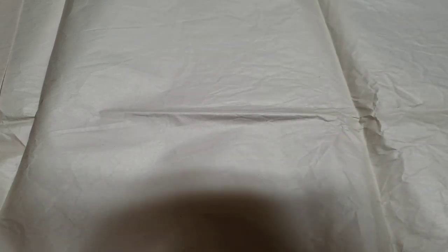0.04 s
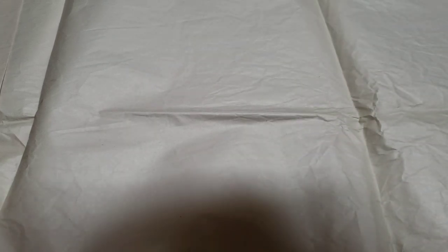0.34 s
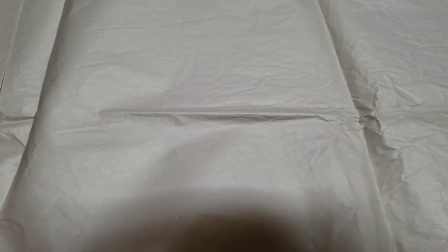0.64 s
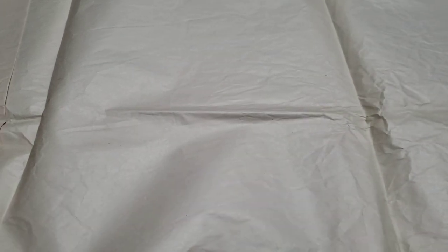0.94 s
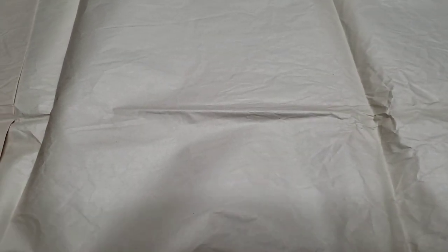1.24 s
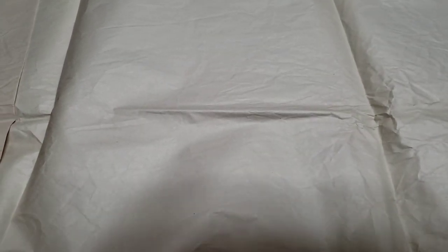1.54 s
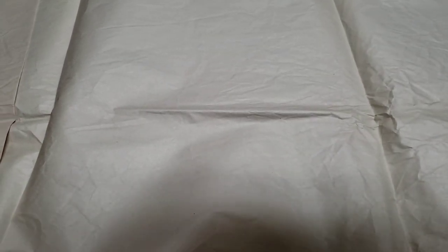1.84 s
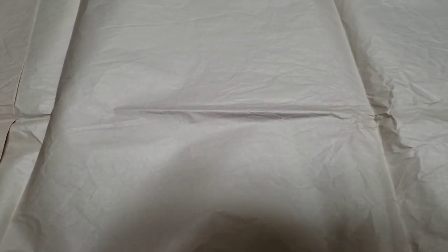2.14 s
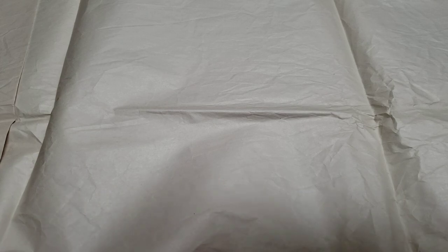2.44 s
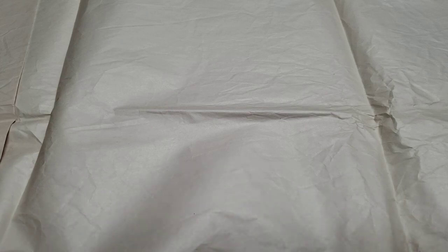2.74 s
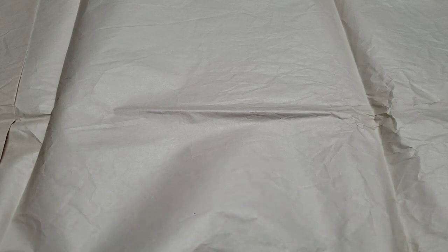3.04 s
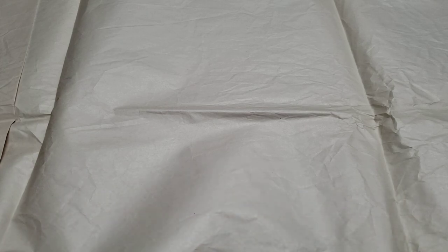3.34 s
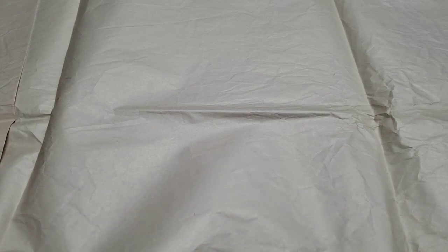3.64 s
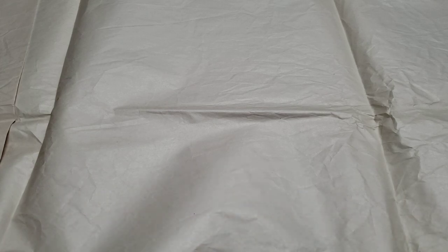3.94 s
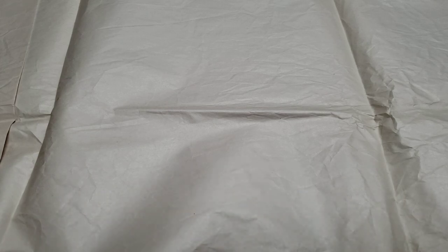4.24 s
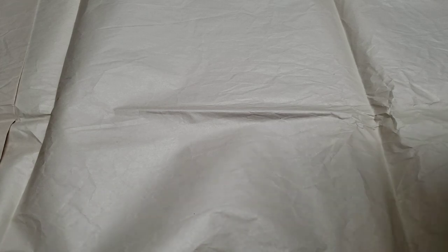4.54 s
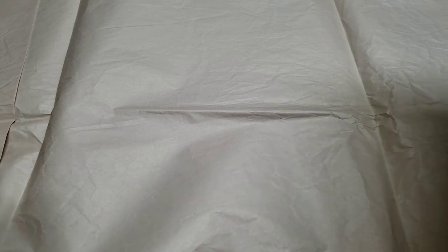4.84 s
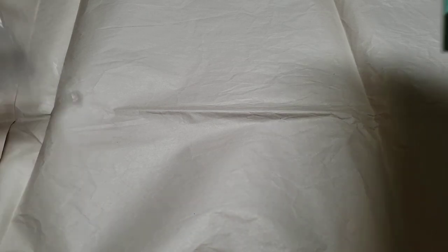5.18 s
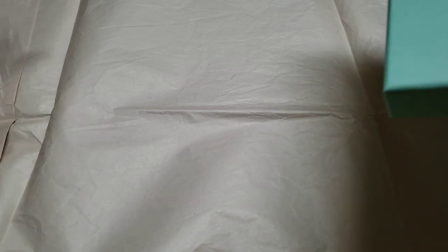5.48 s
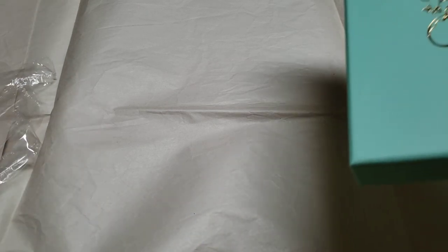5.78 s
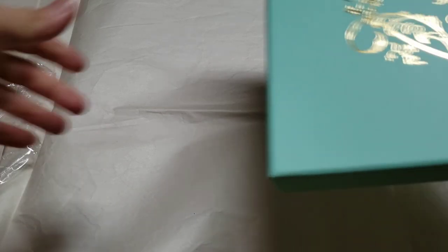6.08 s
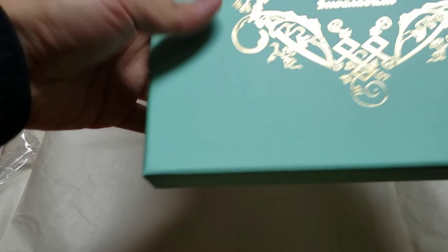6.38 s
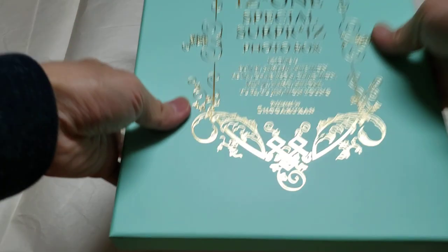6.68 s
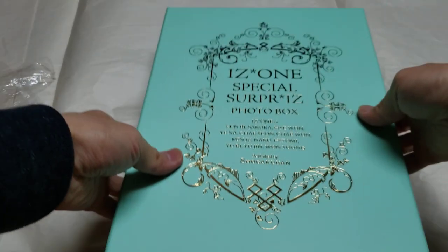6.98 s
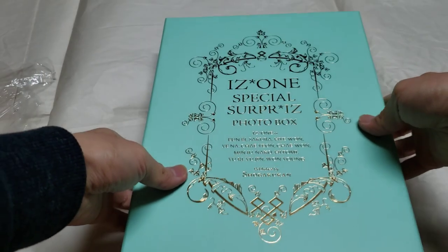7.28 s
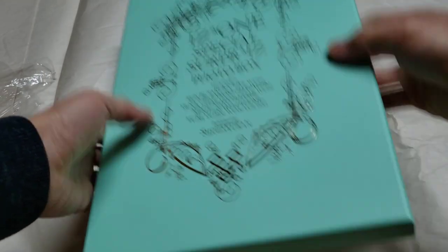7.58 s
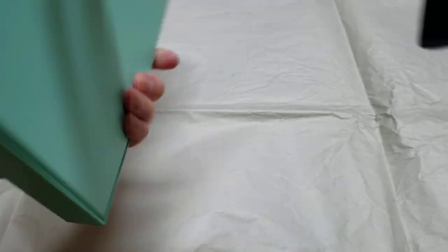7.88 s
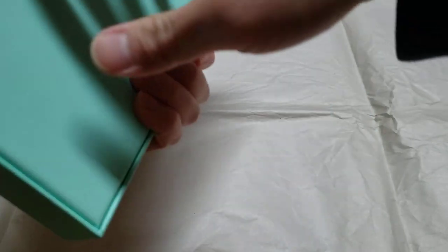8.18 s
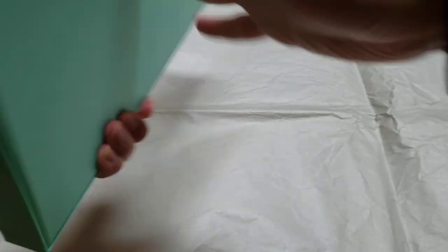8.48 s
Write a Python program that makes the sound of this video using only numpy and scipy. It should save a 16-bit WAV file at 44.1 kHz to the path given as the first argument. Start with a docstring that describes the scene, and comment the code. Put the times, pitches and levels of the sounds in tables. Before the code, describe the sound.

Close tissue paper rustling with crisp snaps and cardboard knocks, followed by light plastic ticks and the soft scrape of a box being handled.

```python
"""Tissue paper in a cardboard box

Hands smooth and crinkle the paper, close to a two-port microphone in a small room. Fibres slip in a
dull scrape and a crisp fizz, creases snap, and the hands rub and bump the hollow cardboard.
Then a plastic wrapper crackles on the left and a smaller box is slid over the paper, gripped and turned.
Narrow hisses and hums come and go, with two faint breathy whistles."""
import sys
import numpy as np
from scipy import signal
from scipy.fft import rfft, irfft
from scipy.io import wavfile
from scipy.ndimage import uniform_filter1d

SR = 44100
rng = np.random.default_rng(int(sys.argv[2]) if len(sys.argv) > 2 else 0)


def persist_wave(psi):
    """Save psi, clipped to +-1, as 16-bit WAV."""
    counts = np.round(np.clip(psi, -1, 1) * 32767).astype(np.int16)
    wavfile.write(sys.argv[1], SR, np.atleast_2d(counts).T)


N = 380141
HZ = np.fft.rfftfreq(4096, 1 / SR)


def gain_of(db):
    """Decibels to amplitude."""
    return 10 ** (np.asarray(db) / 20)


def unit_rms(x):
    """Scales to an rms of 1."""
    return x / np.sqrt(np.mean(x ** 2) + 1e-20)


def at_hz(points, hz, column=1):
    """One column of a table, interpolated over log frequency."""
    table = np.transpose(points)
    return np.interp(np.log(hz + 1), np.log(table[0] + 1), table[column])


def curves(rows):
    """Every column of a time table, at each sample."""
    times, *columns = np.transpose(rows)
    return [np.interp(np.arange(N) / SR, times, column) for column in columns]


def add(mix, start_s, sound):
    """Mixes in a stereo sound."""
    part = mix[:, round(start_s * SR):][:, :sound.shape[-1]]
    part += sound[..., :part.shape[1]]


def through(x, response):
    """Filters each channel with its response."""
    return signal.oaconvolve(np.atleast_2d(x), response, axes=1)[:, :N]


def wander(per_s):
    """A slow random curve with rms 1."""
    knots = rng.standard_normal(N // 40)
    return unit_rms(np.interp(np.arange(N) / SR * per_s, np.arange(len(knots)), knots))


def band_db(hz, width_hz):
    """Spectrum of one resonance."""
    return -20 * np.log10(1 + (2 * (HZ - hz) / width_hz) ** 2)


# Tone of the microphone ports: freq_hz, left_db, right_db
PORT_EQ = [(304, -2.5, 0), (985, 4.5, 3), (2000, -2, 0.5), (3400, 5.5, 0.5), (4475, 11.5, 2.5),
           (5440, -0.5, 2), (6600, -12, 3), (7300, -7.5, 6), (8460, -9, -0.5), (10360, -2, 5),
           (11200, 4, 9.5), (11840, -3.5, 10.5), (13100, -19, 12), (15000, -1, 16.5), (15900, -4.5, 2)]
def colour(spectrum_db, bass_lag_s=0.0007):
    """A click of this spectrum at both ports; bending waves carry its treble across the sheet first."""
    stereo_db = spectrum_db + np.array([at_hz(PORT_EQ, HZ, column) for column in (1, 2)])
    fold = np.r_[1, np.full(len(HZ) - 2, 2), 1, np.zeros(len(HZ) - 2)]
    log_response = rfft(irfft(np.log(gain_of(stereo_db))) * fold)  # minimum phase
    delay_s = bass_lag_s * (1 - HZ / HZ[-1]) ** 2
    click = irfft(np.exp(log_response - 2j * np.pi * np.cumsum(delay_s) * HZ[1]))
    return click / np.sqrt(np.sum(click ** 2) / 4)


def pan(pan_db, click):
    """Gains that move a click without changing its power; pan_db is left minus right."""
    gains = gain_of(np.outer([0.5, -0.5], pan_db))
    energy = np.sum(click ** 2, 1, keepdims=True)
    return gains / np.sqrt((energy * gains ** 2).sum(0) / energy.sum())


def arrival(pan_db, spread=0, decay_s=1):
    """A direct click, offset between the ports, then scatter from the paper and the box walls."""
    cloud = rng.standard_normal((2, 2048)) * np.exp(-np.arange(2048) / SR / decay_s)
    paths = np.sqrt(spread) * cloud / np.linalg.norm(cloud, axis=1, keepdims=True)
    left_lag = int(np.clip(11 - pan_db, -15, 15))
    paths[0, max(left_lag, 0)] += np.sqrt(1 - spread)
    paths[1, max(-left_lag, 0)] += np.sqrt(1 - spread)
    return paths


def diffuse(clicks, decay_s):
    """Every click leaves a short cloud of reflections, different at each port."""
    pole = np.exp(-2 / (decay_s * SR))
    power = signal.lfilter([1 - pole], [1, -pole], clicks ** 2)
    return np.sqrt(power) * rng.standard_normal((2, N))


# Bed of the quiet room: freq_hz, level_db
ROOM_TONE_EQ = [(24, -49), (40, -9.5), (56, 6.5), (80, -8.5), (120, -16.5), (400, -18), (1500, -33.5),
                (4500, -37.5), (9000, -40)]
def room_tone(level_db=-71.5):
    """Low rumble shared by both ports under a faint hiss."""
    hz = np.fft.rfftfreq(N, 1 / SR)
    noise = rfft(rng.standard_normal((3, N)))
    shared = 0.68 / (1 + (hz / 900) ** 2)
    stereo = np.sqrt(shared) * noise[0] + np.sqrt(1 - shared) * noise[1:]
    return gain_of(level_db) * unit_rms(irfft(stereo * gain_of(at_hz(ROOM_TONE_EQ, hz)), N))


def swell(peak_s, rise_s, fall_s, shape=1.82):
    """Power of a hand move that speeds up, then slows; shape 1 is pointed, 2 is a bell."""
    near = slice(max(round((peak_s - 4 * rise_s) * SR), 0), min(round((peak_s + 4 * fall_s) * SR), N))
    t = np.arange(near.start, near.stop) / SR - peak_s
    power = np.zeros(N)
    power[near] = np.exp(-2 * np.maximum(-t / rise_s, t / fall_s) ** shape)
    return power


# Light contact between strokes: time_s, scrape_db
LIGHT_TOUCH = [(0, -63), (.8, -66), (1.4, -70.5), (2.2, -59.5), (3.3, -60.5), (4.85, -63.5), (5.4, -67.5),
               (5.87, -79), (6.95, -68), (7.25, -81), (8.5, -85.5)]
# Strokes over the paper: peak_s, rise_s, fall_s, scrape_db, fizz_over_scrape_db
PAPER_STROKES = [(.115, 0.028, 0.027, -50.5, 4), (0.193, 0.048, 0.035, -44, 2.5),
                 (.43, 0.025, 0.019, -54, 1.5), (.53, 0.095, 0.08, -54.5, 1),
                 (0.706, 0.049, 0.028, -39, 4.5), (.77, .02, 0.019, -62.5, 8),
                 (.9, 0.037, 0.018, -61.5, 11.5), (1.1, 0.22, 0.11, -60, -1), (1.24, 0.12, 0.092, -65, 8),
                 (1.57, 0.085, 0.043, -64, 2), (1.69, 0.039, 0.27, -64.5, 7.5),
                 (2.02, 0.12, 0.028, -53.5, -2), (2.2, 0.12, 0.025, -52, 3), (2.345, 0.065, 0.25, -53.5, 6),
                 (2.584, 0.07, 0.045, -51, 10.5), (2.776, 0.054, 0.0093, -48.5, 2.5),
                 (3.0, 0.065, 0.05, -53, 15.5), (3.088, 0.05, 0.072, -42, 8),
                 (3.19, 0.057, 0.033, -48.5, 4.5), (3.46, 0.12, 0.058, -65, 12.5),
                 (3.62, 0.13, 0.15, -57, 15), (3.99, 0.19, 0.67, -50, -1.5), (4.23, 0.11, 0.18, -46.5, 7),
                 (4.367, 0.057, 0.062, -34, 2), (4.54, 0.056, 0.1, -53, -5), (5.068, 0.16, 0.12, -51, -6),
                 (5.194, 0.038, 0.051, -47.5, -5.5), (5.52, 0.0041, 0.017, -44.5, 1),
                 (5.609, 0.11, 0.11, -53, -6), (6.099, 0.12, 0.3, -65, -9), (6.65, 0.22, 0.19, -58.5, -2),
                 (7.8, 0.12, 0.064, -56.5, -0.5), (7.852, 0.03, 0.066, -67, 15),
                 (8.17, 0.33, 0.088, -69, 6.5), (8.522, 0.0072, 0.016, -53, -5),
                 (8.56, 0.13, 0.13, -67, 10)]
def strokes():
    """Scrape and fizz levels in dB: each stroke swells out of the light touch."""
    touch_db, = curves(LIGHT_TOUCH)
    dull, crisp = gain_of(touch_db) ** 2, gain_of(touch_db - 3) ** 2
    for peak_s, rise_s, fall_s, scrape_db, fizz_over_db in PAPER_STROKES:
        power = swell(peak_s, rise_s, fall_s) * gain_of(scrape_db) ** 2
        dull += power
        crisp += power * gain_of(fizz_over_db) ** 2
    return 10 * np.log10(dull), 10 * np.log10(crisp)


def slips(per_s, uneven_db):
    """Tiny stick-slip clicks, many small and a few large, at a steady mean power."""
    sizes = gain_of(uneven_db * np.minimum(rng.exponential(1, N), 5))
    train = sizes * rng.standard_normal(N) * (rng.random(N) < per_s / SR)
    return train / np.sqrt(np.maximum(uniform_filter1d(train ** 2, size=8000), 1e-9))


# Spots where the paper is touched: pan_db
CONTACT_SPOTS = [-4, 2, 11, 21]
def friction(level_db, pan_db, uneven_db, click, per_s, spread):
    """Fibres slip loudest at the spots near the hand; spread is the scattered share of the power."""
    shares = np.array([np.exp(-abs(pan_db - spot) / 7) for spot in CONTACT_SPOTS])
    shares /= np.linalg.norm(shares, axis=0)
    trains = [slips(per_s, uneven_db) * share * gain_of(level_db) for share in shares]
    direct = sum(through(train, arrival(spot)) for spot, train in zip(CONTACT_SPOTS, trains))
    scattered = diffuse(sum(trains), decay_s=0.0067)
    return through(np.sqrt(1 - spread) * direct + np.sqrt(spread) * scattered, click)


def flexing(sheet, depth_db):
    """As the sheet bends, broad bands of its sound swell and fade."""
    bands = signal.stft(sheet, SR, nperseg=512)[2]
    patches = rng.standard_normal(bands.shape[1:])
    for _ in range(2):
        patches = uniform_filter1d(uniform_filter1d(patches, size=9, axis=0), size=11, axis=1)
    return signal.istft(bands * gain_of(depth_db * unit_rms(patches)), SR, nperseg=512)[1][:, :N]


# Travel of the hands and grain of their slips: time_s, pan_db, uneven_db
HAND_PATH = [(0, 0.5, 2), (1, 0.5, 3), (1.8, 3, 3.5), (2.6, -1, -2), (3.5, 0.5, 2.5), (4.35, 4.5, -0.5),
             (4.6, 6.5, 6), (5.15, 5, 5.5), (5.6, 8, 4.5), (6.1, -2.5, -0.5), (7.2, 1, -4), (7.8, 4, -0.5),
             (8.15, 11, 0.5)]
def rustle(fizz, scrape, dull_db, crisp_db):
    """Scrape and fizz flutter, and small folds crackle, as the paper catches and lets go."""
    pan_db, uneven_db = curves(HAND_PATH)
    flutter_db = uneven_db * (0.32 * wander(60) + 0.35 * wander(17))
    dull = friction(dull_db + flutter_db, pan_db, uneven_db, scrape, per_s=2200, spread=0.88)
    crisp = friction(crisp_db + flutter_db, pan_db, uneven_db, fizz, per_s=2100, spread=0.56)
    crackle = friction(crisp_db - 11 + uneven_db, pan_db, uneven_db, fizz, per_s=36, spread=0)
    sheet = dull * pan(0.5 * pan_db, scrape) + (crisp + crackle) * pan(pan_db, fizz)
    return flexing(sheet, depth_db=1.4)


# Hands pressing through the paper: peak_s, rise_s, fall_s, level_db
BOX_PUSHES = [(0.712, 0.038, 0.035, -60), (1.14, 0.13, 0.085, -68.5), (2.718, 0.24, 0.15, -65),
              (3.08, .02, 0.055, -53.5), (3.93, 0.28, 0.1, -72.5), (4.461, 0.036, 0.097, -62.5),
              (4.37, 0.035, 0.053, -41), (7.54, 0.037, .25, -78), (7.79, 0.053, 0.056, -63),
              (7.859, 0.064, 0.023, -64), (8.005, 0.04, 0.047, -73)]
def box_rubbing(dull_db, bleed_db=-26.5):
    """Stick-slip that drives the cardboard: the pushes, plus a little of every stroke."""
    pushed = sum(swell(s, rise, fall) * gain_of(db) ** 2 for s, rise, fall, db in BOX_PUSHES)
    pressure = np.sqrt(pushed + gain_of(dull_db + bleed_db) ** 2)
    rub = slips(per_s=6000, uneven_db=1) * pressure * gain_of(2 * wander(50))
    return rub + 0.61 * diffuse(rub, decay_s=0.00446)


# Snapping creases: start_s, crisp_db, dull_db, pan_db
CREASE_SNAPS = [(0.122, -5, -7.5, 4.5), (0.173, -11, -4.5, 6), (0.1975, -11, -35, -9.5),
                (0.31, -9, -24, -1.5), (0.373, -17, -31.5, 4), (0.5345, -5, -24.5, -22),
                (0.544, -11, -22.5, 5), (0.5823, -10, -28, 4), (0.6597, -14, -22.5, 3.5),
                (0.6722, -14, -28, -9.5), (0.6807, -14, -23, -14), (0.699, -2.5, -19.5, -5),
                (0.7715, -17.5, -38, -14), (0.9629, -12, -51, -6), (0.9816, -16.5, -42, -3),
                (1.5545, -26, -52, -7), (1.6571, -18.5, -54, 3.5), (1.897, -22, -26.5, 2.5),
                (1.9862, -31.5, -28.5, 3.5), (2.137, -14, -22, 6.5), (2.8656, -18.5, -39, -4.5),
                (3.2513, -21, -40, -5.5), (4.2805, -11, -22.5, 0), (5.3078, -26, -39, 10),
                (5.518, -24, -28.5, 6), (5.7801, -31, -40.5, 4)]
def snaps(fizz, scrape_db):
    """A crease flips over with a sharp click and flicks the paper beside it."""
    crisp, dull = np.zeros((2, 2, N))
    flap = colour(band_db(hz=2300, width_hz=3300) + scrape_db)
    for start_s, crisp_db, dull_db, pan_db in CREASE_SNAPS:
        snap = arrival(pan_db, spread=0.2, decay_s=0.002)
        flick = arrival(pan_db, spread=0.58, decay_s=0.0018)
        add(crisp, start_s, gain_of(crisp_db) * pan(pan_db, fizz) * snap)
        add(dull, start_s, gain_of(dull_db) * pan(0.15 * pan_db, flap) * flick)
    return through(crisp, fizz) + through(dull, flap)


# Hands bumping the cardboard: start_s, hollow_db, slap_db, pitch_hz
BOX_KNOCKS = [(0.172, -33.5, -28, 657), (0.98, -35, -43, 300), (1.2627, -26.5, -28, 980),
              (1.4265, -37, -29.5, 377), (2.222, -20, -13, 624), (2.315, -24.5, -25, 654),
              (2.3519, -26, -28, 694), (2.429, -29, -23.5, 1050), (2.6254, -19, -10, 740),
              (2.857, -26, -36.5, 292), (3.0633, -17, -10, 604), (3.083, -26, -9, 466),
              (3.1141, -20, -11, 276), (4.3506, -13.5, -9.5, 600), (4.3723, -14, -6, 433),
              (8.518, -47, -32, 396)]
def knocks():
    """Each knock rings a panel and slaps paper against it; returns blows and slaps."""
    blows, slaps = np.zeros((2, 2, N))
    t = np.arange(2048) / SR
    for start_s, hollow_db, slap_db, pitch_hz in BOX_KNOCKS:
        ring = np.sin(2 * np.pi * pitch_hz * t) * np.exp(-t / 0.0041)
        blow = 0.95 * arrival(6.7, spread=0.92, decay_s=0.018) + 0.19 * ring / np.linalg.norm(ring)
        add(blows, start_s, gain_of(hollow_db) * blow)
        add(slaps, start_s, gain_of(slap_db) * arrival(9.6, spread=0.73, decay_s=0.011))
    return blows, slaps


# Hollow tone of the cardboard: freq_hz, level_db
HOLLOW_EQ = [(30, -17), (70, 3), (150, 1), (400, 3), (700, -2.5), (1250, -3), (2000, -4), (9000, -47)]
# Resonances of the box: pitch_hz, width_hz, boost_db
BOX_MODES = [(337.6, 23, 6), (425, 14, 7), (595, 190, 3)]
def cardboard(scrape, dull_db):
    """Rubbing and knocks sound the hollow box; the slaps have the tone of paper."""
    modes_db = sum(db / (1 + (2 * (HZ - hz) / width) ** 2) for hz, width, db in BOX_MODES)
    hollow = colour(at_hz(HOLLOW_EQ, HZ) + modes_db)
    rub = box_rubbing(dull_db)
    blows, slaps = knocks()
    body = rub + blows
    narrowed = (body + body.mean(0)) / 2  # the low body is much alike at both ports
    return through(narrowed, hollow) + through(slaps, scrape)


def resonate(x, hz, width_hz):
    """A steep resonance that follows the curve hz."""
    carrier = np.exp(2j * np.pi * np.cumsum(hz) / SR)
    pole = np.exp(-np.pi * width_hz / SR)
    return (carrier * signal.lfilter([(1 - pole) ** 2], [1, -2 * pole, pole * pole], x / carrier)).real


# Brief swells of pitched noise: peak_s, half_length_s, level_db, pitch_hz, width_hz
NOISE_BANDS = [(0.546, 0.047, -61, 477, 200), (0.422, 0.018, -56, 4270, 2020),
               (.715, 0.034, -57.5, 530, 200), (0.895, 0.016, -48.5, 6050, 2210),
               (1.1, 0.064, -66, 377, 200), (2.744, 0.028, -57.5, 1200, 250), (4.264, 0.059, -58, 660, 296),
               (4.286, 0.054, -52.5, 1390, 1400), (6.155, .08, -73, 2560, 590),
               (6.329, 0.045, -65.5, 1160, 180), (6.69, 0.19, -66.5, 2520, 850),
               (8.12, 0.13, -62.5, 3890, 1400)]
def hisses_and_hums():
    """Narrow hisses and hums that drift in pitch, and two faint breathy whistles near 1.2 kHz."""
    out, t = np.zeros((2, N)), np.arange(N) / SR
    ports = colour(np.zeros(len(HZ)))
    noise = rng.standard_normal((2, N)) + rng.standard_normal(N)
    drift = 1 + 0.05 * wander(per_s=14)
    for peak_s, half_s, level_db, pitch_hz, width_hz in NOISE_BANDS:
        near = abs(t - peak_s) < np.pi * half_s
        band = resonate(noise[:, near], pitch_hz * drift[near], width_hz)
        ring = through(band, ports)[:, :near.sum()]
        bell = np.exp(-0.5 * ((t[near] - peak_s) / half_s) ** 2)
        out[:, near] += gain_of(level_db) * bell * ring / ring.mean(0).std()
    return out


# Low thumps: start_s, energy_db, pitch_hz, t60_s
BOX_THUMPS = [(0.993, -21.5, 67, 0.085), (2.349, -20, 169, 0.035), (3.066, -22.5, 91, 0.078),
              (7.089, -20, 68.8, 0.23)]
def thumps():
    """A soft push rocks the whole box for a few cycles."""
    out, t = np.zeros((2, N)), np.arange(SR // 3) / SR
    for start_s, energy_db, pitch_hz, t60_s in BOX_THUMPS:
        envelope = np.exp(-np.log(1000) * t / t60_s) * (1 - np.exp(-t / 0.0021))
        swing = np.sin(2 * np.pi * pitch_hz * t) * envelope
        add(out, start_s, gain_of(energy_db) * swing / np.linalg.norm(swing))
    return out


# Ticks of the plastic wrapper: start_s, level_db
WRAPPER_TICKS = [(4.5918, -28), (4.6473, -28), (4.742, -28), (4.8382, -23.5), (4.9225, -29), (4.9682, -38),
                 (4.9975, -21), (5.042, -33), (5.078, -23), (5.094, -24.5), (5.449, -36)]
def wrapper(fizz, scrape_db, pan_db=25, ring_db=1):
    """Stiff plastic buckles on the left, each tick a crisp click plus the ring of the film."""
    ticks = np.zeros((2, N))
    film = colour(band_db(hz=4200, width_hz=4500) + scrape_db)
    for start_s, level_db in WRAPPER_TICKS:
        add(ticks, start_s, gain_of(level_db) * arrival(pan_db, spread=0.49, decay_s=0.0015))
    click = pan(pan_db, fizz) * fizz + gain_of(ring_db) * pan(0.5 * pan_db, film) * film
    return through(ticks, click)


# Decay of the small room: freq_hz, t60_s
ROOM_DECAY = [(700, 0.16), (3000, 0.075), (13000, 0.032)]
def reverb(send):
    """A short tail that dies sooner in the treble."""
    hz, t, bands = signal.stft(rng.standard_normal((2, SR // 2)), SR, nperseg=256)
    decay = np.exp(-np.log(1000) * t / at_hz(ROOM_DECAY, hz)[:, None])
    attack = 1 - np.exp(-t / 0.0045)
    tail = signal.istft(bands * decay * attack, SR, nperseg=256)[1]
    return through(send, tail / np.linalg.norm(tail[0]))


# Crisp fizz of the paper: freq_hz, level_db
FIZZ_EQ = [(1500, -70), (4000, -8), (6500, -1), (9000, -3.5), (12000, 7), (16000, -6)]
# Dull scrape of the paper: freq_hz, level_db
SCRAPE_EQ = [(300, -46), (900, -15.5), (1500, -5.5), (2600, 0.5), (4200, 1.5), (6000, 0.5), (14000, -13)]
def scene():
    """Paper, wrapper and box up close, with a little reverb, over room tone."""
    scrape_db = at_hz(SCRAPE_EQ, HZ)
    fizz, scrape = colour(at_hz(FIZZ_EQ, HZ)), colour(scrape_db)
    dull_db, crisp_db = strokes()
    texture = rustle(fizz, scrape, dull_db, crisp_db) + hisses_and_hums()
    texture += snaps(fizz, scrape_db) + wrapper(fizz, scrape_db)
    box = cardboard(scrape, dull_db) + thumps()
    send = gain_of(-14) * texture + gain_of(-16.5) * box
    return texture + box + reverb(send) + room_tone()


def record(dry):
    """A steep high cut at 15.8 kHz."""
    lowpass = signal.firwin(511, 15800, window=("kaiser", 8), fs=SR)
    return signal.oaconvolve(dry, lowpass[None], "same", axes=1)


dry = scene()
out = record(dry)
persist_wave(out)
```